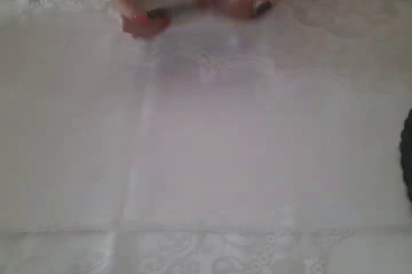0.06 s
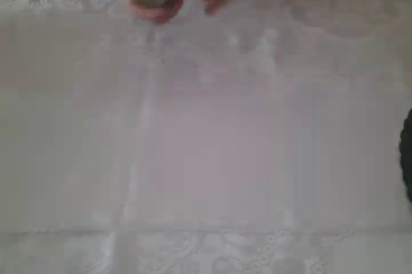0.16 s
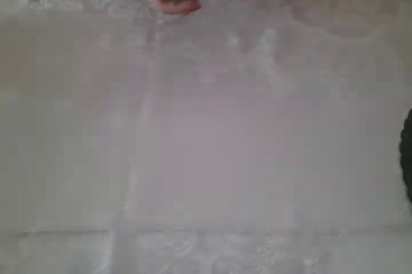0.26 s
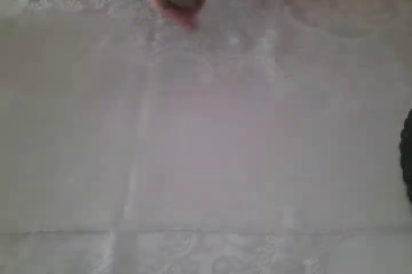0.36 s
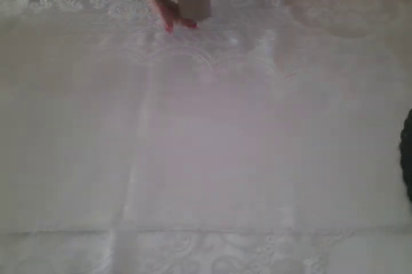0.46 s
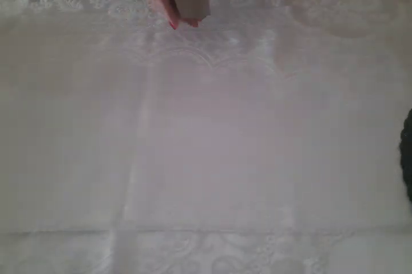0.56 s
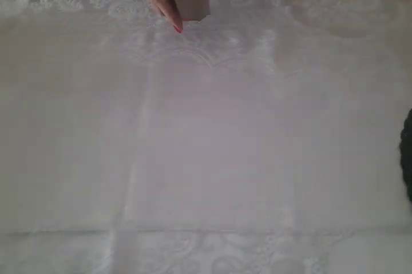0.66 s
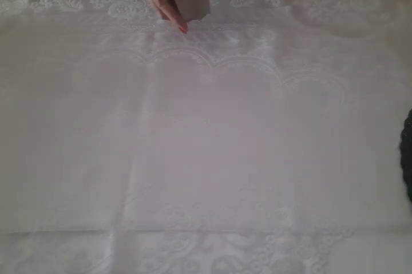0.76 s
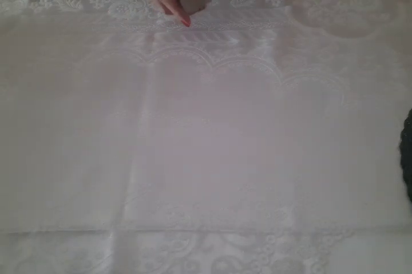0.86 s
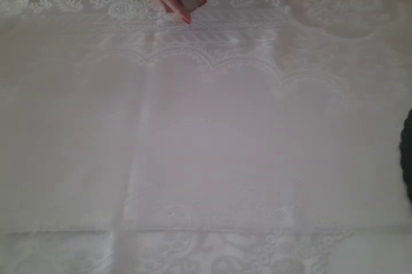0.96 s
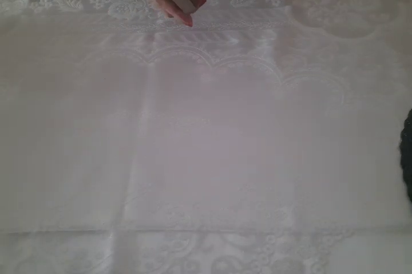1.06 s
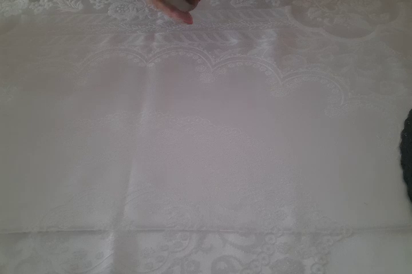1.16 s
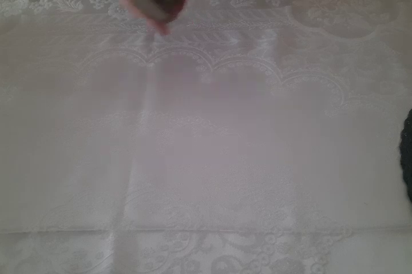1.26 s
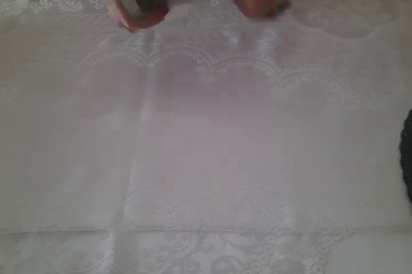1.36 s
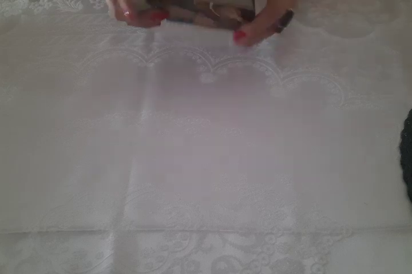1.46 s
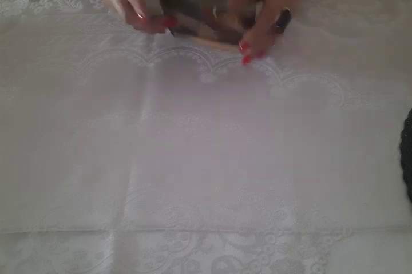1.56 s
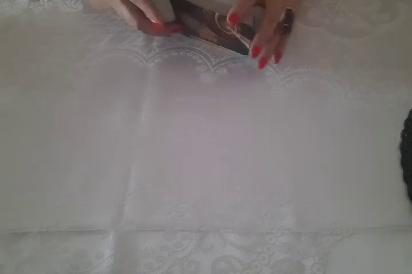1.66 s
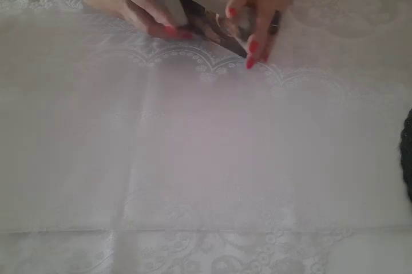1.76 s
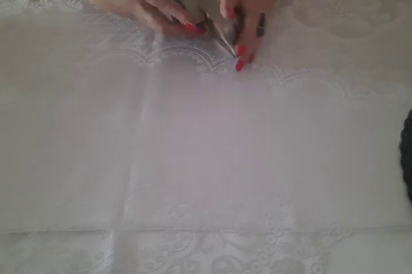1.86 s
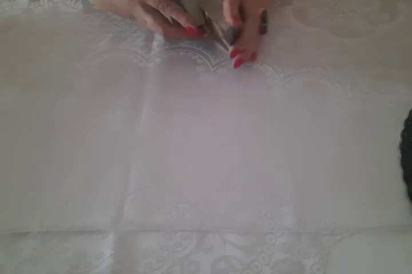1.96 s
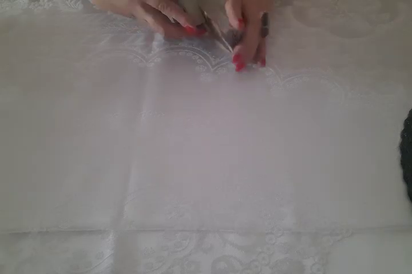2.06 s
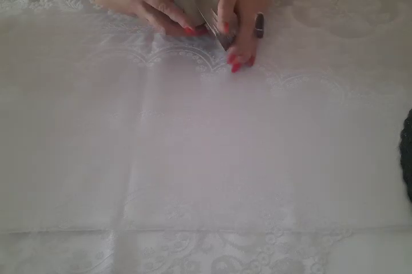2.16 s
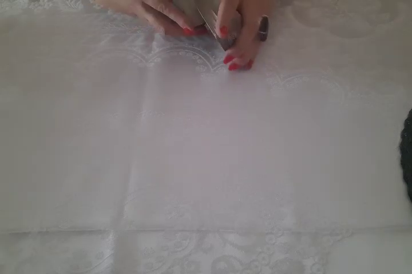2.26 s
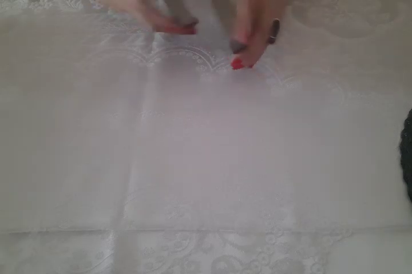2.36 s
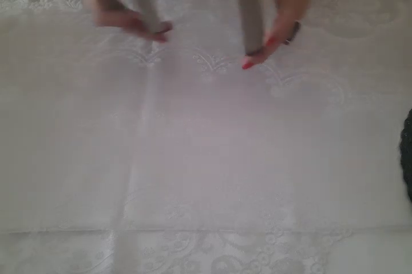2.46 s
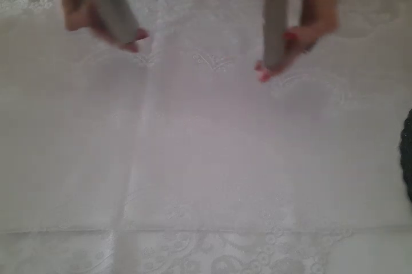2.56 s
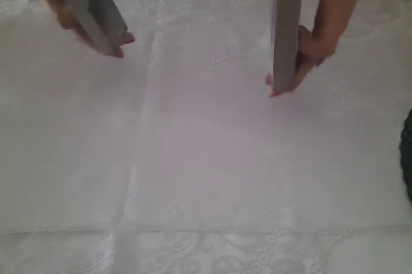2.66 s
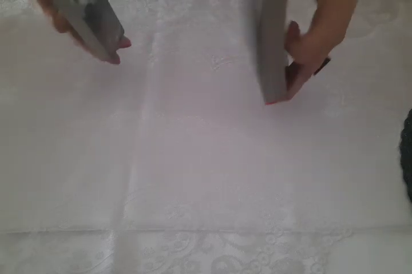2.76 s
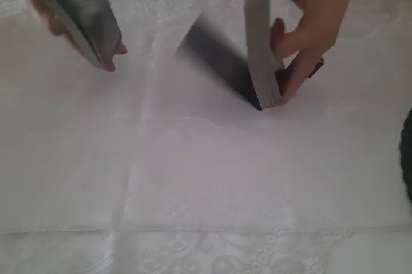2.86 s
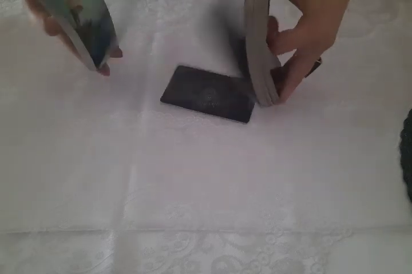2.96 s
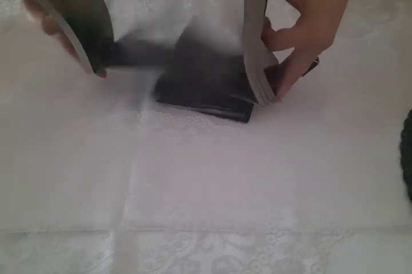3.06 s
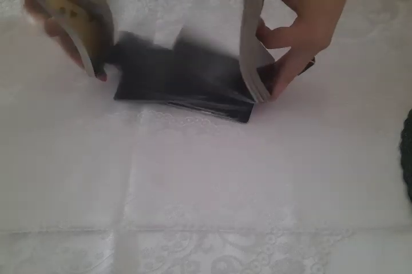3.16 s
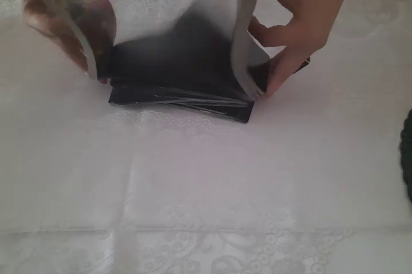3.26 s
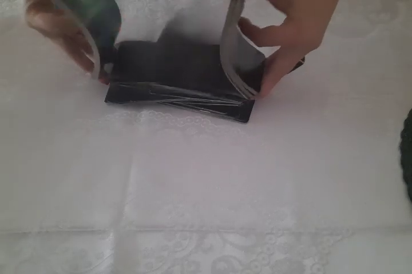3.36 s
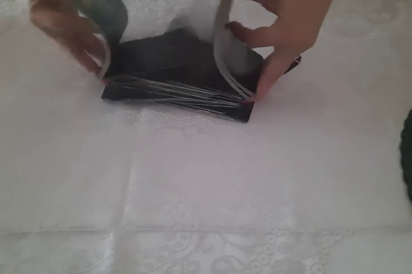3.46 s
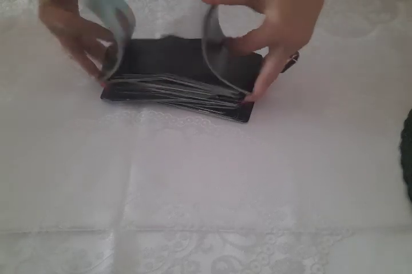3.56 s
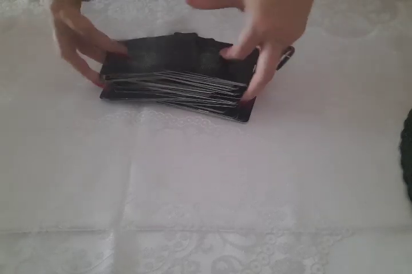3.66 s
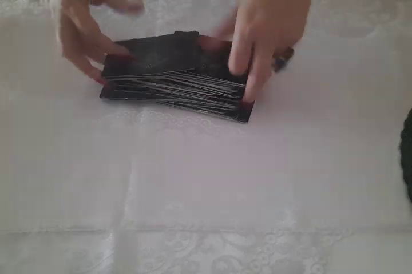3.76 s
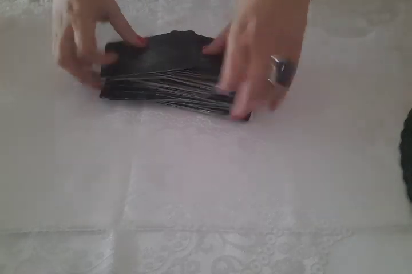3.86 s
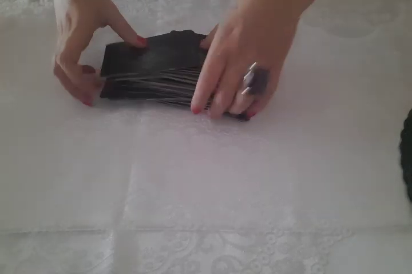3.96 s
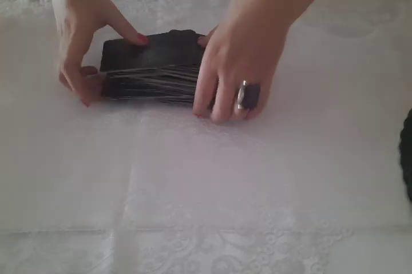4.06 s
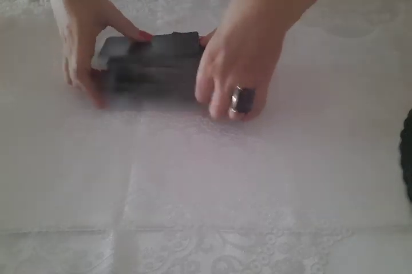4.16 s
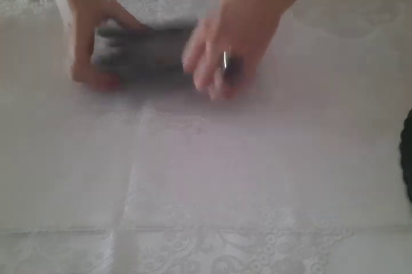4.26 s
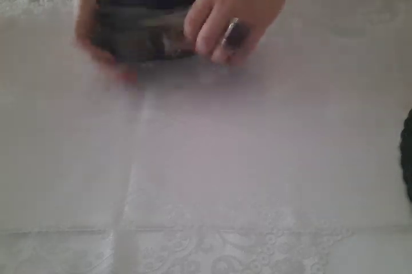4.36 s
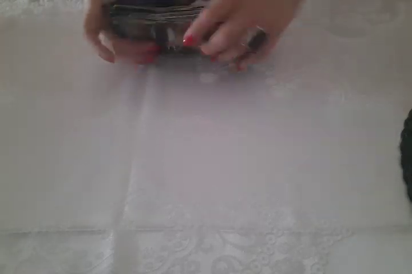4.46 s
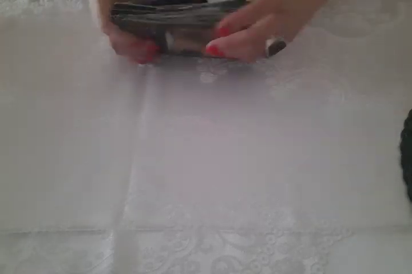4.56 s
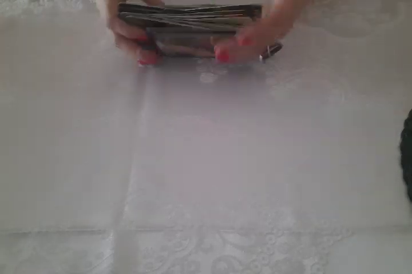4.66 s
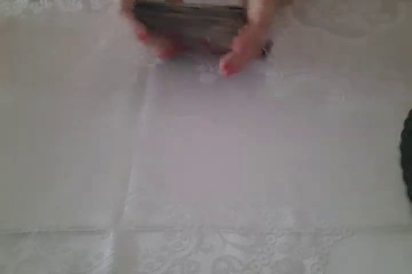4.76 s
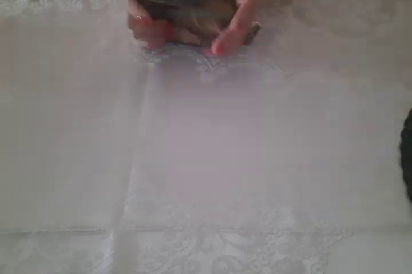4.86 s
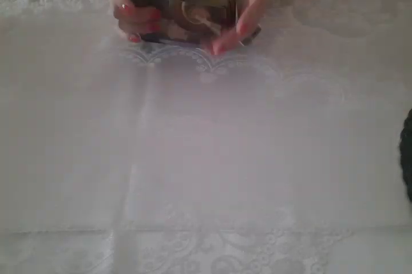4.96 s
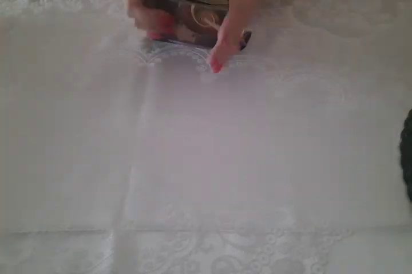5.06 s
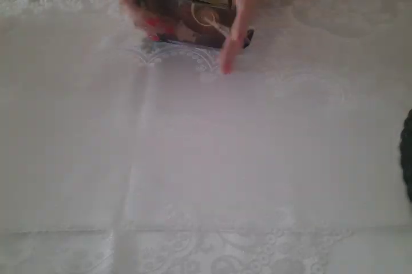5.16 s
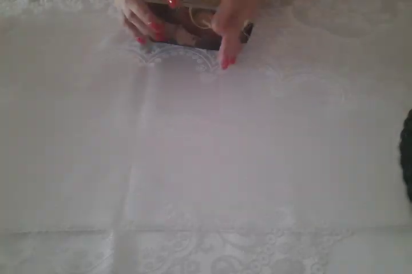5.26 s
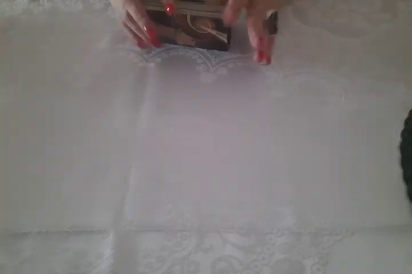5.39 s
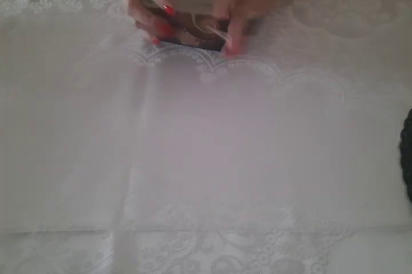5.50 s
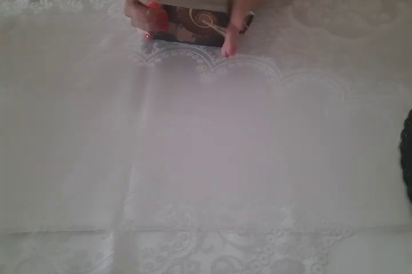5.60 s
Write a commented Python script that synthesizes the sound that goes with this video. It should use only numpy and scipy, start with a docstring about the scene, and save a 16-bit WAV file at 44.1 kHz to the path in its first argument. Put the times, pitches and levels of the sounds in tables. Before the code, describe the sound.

A deck of cards is handled close to the microphone in a small, slightly echoing room. Cards rub softly as the deck is cut and knocks on a cloth-covered table. Then comes one quick, loud riffle, a growing flutter with sharp snaps. Afterwards the deck is squared with light knocks, small ticks and short sliding strokes. Still air and a faint low rumble lie underneath.

```python
"""A deck of cards is handled close by in a small live room, over still air and a low rumble.
First it is cut: card rubs softly on card, and the deck knocks on a cloth-covered table. About three
seconds in comes the riffle: each bent card snaps off a thumb, slaps the pile and slides over it. A few
crack loudly; the rest run into a flutter that grows with the pile. Last, the deck is squared with
light knocks, small ticks and short strokes of sliding friction."""
import sys
import numpy as np
from scipy import signal
from scipy.fft import rfft, irfft
from scipy.io import wavfile
from scipy.ndimage import uniform_filter1d

SR = 44100
rng = np.random.default_rng(int(sys.argv[2]) if len(sys.argv) > 2 else 0)


def wav_record(signal):
    """Record a signal, one row per channel, as 16-bit PCM in the file named by sys.argv[1]."""
    frames = np.transpose(np.atleast_2d(signal))
    bounded = np.clip(frames, -1, 1)
    # unit amplitude maps onto the largest positive 16-bit level
    quanta = np.round(bounded * 32767).astype(np.int16)
    wavfile.write(sys.argv[1], SR, quanta)


N = 248283


def amp(db):
    """Amplitude ratio of a level in decibels."""
    return 10 ** (np.asarray(db) / 20)


def unit(x):
    """Normalisation to rms 1."""
    return x / np.sqrt(np.mean(x ** 2) + 1e-20)


def read(points, hz):
    """Interpolation of a table on a log-frequency axis."""
    frequency_hz, value = np.transpose(points)
    return np.interp(np.log(hz + 1), np.log(frequency_hz + 1), value)


def envelope(rows):
    """Amplitude envelope through rows of time_s, level_db."""
    return amp(np.interp(np.arange(N) / SR, *np.transpose(rows)))


def add(mix, start_s, sound):
    """Superposition: a stereo sound joins the mix at start_s."""
    part = mix[:, max(round(start_s * SR), 0):][:, :sound.shape[1]]
    part += sound[:, :part.shape[1]]


def colour(x, spectrum, size=4096):
    """Minimum-phase filtering: a causal response with the given spectrum."""
    log_gain = np.log(amp(read(spectrum, abs(np.fft.fftfreq(size, 1 / SR)))))
    response = np.fft.ifft(np.exp(np.conj(signal.hilbert(log_gain)))).real[:size // 2]
    return signal.fftconvolve(x, response[None], axes=1)[:, :x.shape[1]]


# likeness of left and right: frequency_hz, correlation
COHERENCE = [(50, 0.64), (300, 0.91), (700, 0.29), (2000, 0.46), (4500, 0.11), (15000, 0.4)]
def pair(x):
    """Partial coherence: two independent signals become a stereo pair, most alike in the bass."""
    a, b = rfft(x)
    same = np.clip(read(COHERENCE, np.fft.rfftfreq(x.shape[1], 1 / SR)), -1, 1)
    return irfft([a, same * a + np.sqrt(1 - same ** 2) * b], x.shape[1])


def noise(spectrum, grain_db=0, grain_s=.004):
    """Random amplitude modulation: coloured stereo noise, roughened in short grains."""
    grains = unit(uniform_filter1d(rng.standard_normal(N), max(round(grain_s * SR), 1)))
    rough = pair(rng.standard_normal((2, N))) * amp(grain_db * grains)
    return unit(colour(rough, spectrum))


def strike(spectrum, decay_s, crack, span_s=.004, lag_s=0, size=4096):
    """Impact: an impulse, lag_s later on the right, and damped chatter; energy of rms 1 over span_s."""
    t = np.arange(size) / SR
    chatter = pair(rng.standard_normal((2, size))) * np.exp(-t / max(decay_s, 1 / SR))
    chatter /= np.linalg.norm(chatter[0])
    arrivals = [max(round(-lag_s * SR), 0), max(round(lag_s * SR), 0)]
    chatter[[0, 1], arrivals] -= crack
    return unit(colour(chatter, spectrum)) * np.sqrt(span_s * SR / size)


# still air of the room: frequency_hz, level_db
AIR_SPECTRUM = [(15, -41.5), (25, -39.5), (55, -11), (78, -1.5), (97, -41.5), (130, -1.5), (256, -10.5),
                (301, -1), (405, -12.5), (714, -7.5), (1480, -20), (2160, -26), (3720, -39.5),
                (11900, -39.5), (16000, -45.5)]
# rumble of the room and of hands on the cloth: frequency_hz, level_db
RUMBLE_SPECTRUM = [(25, -25), (45, -8), (65, 13.5), (90, -7.5), (125, 8), (155, -9.5), (188, 10.5),
                   (245, -14.5), (320, 0.5), (450, -18), (1200, -37.5)]
# course of that rumble: time_s, level_db
RUMBLE_LEVELS = [(0, -61), (.55, -59.5), (1.05, -66), (1.9, -57), (2.1, -73.5), (2.85, -73), (4.25, -69),
                 (4.6, -57.5), (5.63, -68.5)]
def background(air_db=-62):
    """Ambient noise: steady air and a low rumble whose level drifts."""
    return amp(air_db) * noise(AIR_SPECTRUM) + envelope(RUMBLE_LEVELS) * noise(RUMBLE_SPECTRUM)


# time the room takes to fall by 60 dB: frequency_hz, decay_s
REVERB_TIMES = [(100, 0.57), (400, 0.36), (1200, 0.51), (3000, 0.5), (7000, 0.47), (15000, 0.34)]
def tail(onset_s=.0025):
    """Diffuse reverberation of energy 1: a quick build-up, then exponential decay in each band."""
    hz, time_s, bands = signal.stft(pair(rng.standard_normal((2, SR))), SR, nperseg=256)
    decay = amp(-60 * time_s / read(REVERB_TIMES, hz)[:, None])
    wash = signal.istft(bands * decay, SR, nperseg=256)[1][:, :SR]
    wash *= 1 - np.exp(-(np.arange(SR) / SR / onset_s) ** 2)
    return wash / np.linalg.norm(wash[0])


# echoes from near surfaces: delay_s, level_db
EARLY_REFLECTIONS = [(.0032, -19.5), (0.011, -19.5), (0.017, -26), (.0238, -20.5)]
def room(x, wet_db, tails=3, crossfade_hz=5):
    """Reflection: direct sound, single echoes, then tails that crossfade as if the source moved."""
    wet = np.zeros((2, N))
    for delay_s, level_db in EARLY_REFLECTIONS:
        add(wet, delay_s, amp(level_db) * x)
    turn = 2 * np.pi * crossfade_hz * np.arange(N) / SR
    for k in range(tails):
        share = np.sqrt(2 / tails) * np.cos(turn + np.pi * k / tails)  # the squares sum to 1
        wet += signal.fftconvolve(x * share, tail(), axes=1)[:, :N]
    return x + amp(wet_db) * wet


def stroke(start_s, length_s, rise_share=.3, fall_share=.45, creep_db=-16.5, creep_s=.045):
    """Sliding speed in one stroke: the card creeps, speeds up, holds, slows and creeps again."""
    since_s = np.arange(N) / SR - start_s
    progress = since_s / length_s
    ramps = np.minimum(progress / rise_share, (1 - progress) / fall_share)
    outside_s = np.maximum(abs(since_s - length_s / 2) - length_s / 2, 0)
    creep = amp(creep_db) * np.exp(-(outside_s / creep_s) ** 2)
    return np.maximum(np.minimum(ramps, 1), creep)


# strokes of card over card: start_s, length_s, fine_db, body_db
STROKES = [(0, 0.027, -73, -73), (0.045, 0.076, -66.5, -84), (0.194, 0.082, -68, -76),
           (0.25, 0.14, -73.5, -78), (0.642, 0.16, -82, -77.5), (0.903, 0.077, -64, -63.5),
           (0.97, 0.18, -77, -74), (1.115, 0.084, -65, -66.5), (1.17, 0.16, -78, -70.5),
           (1.272, 0.077, -63.5, -63), (1.523, 0.1, -59, -61), (1.62, 0.28, -66, -64),
           (1.904, 0.091, -77, -78), (2.053, 0.095, -76, -74.5), (2.303, 0.047, -69.5, -81),
           (2.535, 0.12, -77, -75.5), (2.688, 0.19, -76.5, -89), (2.904, 0.097, -66.5, -61),
           (3.88, 0.27, -70.5, -68.5), (4.138, 0.064, -64, -64.5), (4.215, 0.088, -69, -68),
           (4.317, 0.2, -64, -58.5), (4.477, 0.21, -67.5, -62.5), (4.658, 0.17, -53, -54),
           (4.866, 0.085, -64.5, -63), (4.981, 0.06, -60.5, -59.5), (5.174, 0.073, -62, -67),
           (5.457, 0.1, -62.5, -61), (5.56, 0.098, -82, -81.5)]
# fine friction and its fuller body: frequency_hz, level_db
FINE_SPECTRUM = [(1000, -24), (3000, -17.5), (4500, -9), (6200, 0), (9500, -4), (12500, 1), (16000, -5)]
BODY_SPECTRUM = [(150, 1.5), (600, -2.5), (1300, 4), (2200, -3), (4000, 0), (8000, -15)]
# brief squeaks of card on card: start_s, length_s, pitch_hz, level_db
CARD_SQUEAKS = [(0.234, 0.11, 2290, -67), (0.612, 0.07, 3050, -81), (4.434, 0.0107, 2580, -51)]
def rubbing(catches_per_s=22, catch_db=9, catch_s=.0015):
    """Sliding friction: thin when light, fuller when pressed; edges catch with a tick, or squeak."""
    fine = sum(amp(fine_db) * stroke(start_s, length_s) for start_s, length_s, fine_db, _ in STROKES)
    body = sum(amp(body_db) * stroke(start_s, length_s) for start_s, length_s, _, body_db in STROKES)
    caught = rng.random(N) < catches_per_s / SR
    catches = signal.lfilter([1], [1, -np.exp(-1 / (catch_s * SR))], caught)
    out = fine * (1 + amp(catch_db) * catches) * noise(FINE_SPECTRUM, grain_db=2, grain_s=.007)
    out += body * noise(BODY_SPECTRUM, grain_db=3, grain_s=.008)
    for start_s, length_s, pitch_hz, level_db in CARD_SQUEAKS:
        band = signal.butter(2, [pitch_hz * .94, pitch_hz * 1.06], "band", fs=SR, output="sos")
        squeak = signal.sosfilt(band, rng.standard_normal((2, SR)))[:, :round(length_s * SR)]
        add(out, start_s, amp(level_db) * unit(squeak) * signal.windows.tukey(squeak.shape[1], .4))
    return out


# deck or fingers meeting the table: start_s, thud_db, knock_db, clack_db, contact_s
TABLE_TAPS = [(1.249, -64, -63, -67.5, 0.015), (1.313, -58.5, -63, -67, 0.0089),
              (1.5533, -36.5, -34, -35.5, .015), (1.839, -57.5, -67, -64.5, .028),
              (3.951, -41.5, -55, -64.5, .019), (4.084, -54.5, -64.5, -73, 0.0076),
              (4.391, -69, -54, -58.5, 0.027), (4.457, -52, -56, -61.5, .011),
              (4.539, -56, -56, -63, 0.019), (4.5718, -64, -52, -44.5, 0.00181),
              (4.899, -52, -50, -59.5, 0.021), (5.003, -58, -59.5, -56.5, 0.00257),
              (5.219, -52, -55.5, -60, 0.016), (5.505, -59.5, -80, -68, .017)]
# low thud, middle knock and clack of card edges: frequency_hz, level_db
THUD_SPECTRUM = [(30, -19), (65, 1), (90, -13.5), (122, 6), (160, -1), (230, -4), (320, -0.5), (450, -21.5),
                 (1200, -52)]
KNOCK_SPECTRUM = [(180, -36), (350, 0.5), (480, 5.5), (650, -2.5), (800, -1.5), (1100, -25.5), (3000, -54)]
CLACK_SPECTRUM = [(500, -30.5), (900, 2), (1300, -1.5), (1750, -7.5), (2400, -15.5), (3500, -21.5),
                  (6000, -36), (15000, -63)]
def taps(settle_contacts=.9, settle_db=-2.5, span_s=.02):
    """Double impact: one corner of the deck lands, then the other; the table thuds and edges clack."""
    out = np.zeros((2, N))
    for start_s, thud_db, knock_db, clack_db, contact_s in TABLE_TAPS:
        for at_s, corner_db in (start_s, 0), (start_s + settle_contacts * contact_s, settle_db):
            thud = amp(thud_db) * strike(THUD_SPECTRUM, contact_s + .017, crack=1, span_s=span_s)
            knock = amp(knock_db) * strike(KNOCK_SPECTRUM, contact_s + .0045, crack=.33, span_s=span_s)
            clack = amp(clack_db) * strike(CLACK_SPECTRUM, contact_s, crack=.31, span_s=span_s)
            add(out, at_s, amp(corner_db) * (thud + knock + clack))
    return out


def gate(start_s, end_s, release_db_per_s=796.5):
    """Exponential release: the run opens, holds, and dies quickly once the thumbs are empty."""
    t = np.arange(N) / SR
    return (t >= start_s) * amp(-release_db_per_s * np.maximum(t - end_s, 0))


# how hard the thumbs let the cards run: time_s, effort_db
THUMB_EFFORT = [(2.985, -13.5), (3.095, -11), (3.112, 2.5), (3.195, -8), (3.224, -4.5), (3.43, 2.5),
                (3.55, -9.5), (3.63, 4), (3.705, -5)]
# fluttering cards, expelled air and sliding faces: frequency_hz, level_db
FLUTTER_SPECTRUM = [(150, -31), (400, -7.5), (700, 8.5), (1000, -10), (1600, 0), (2200, 4), (3500, -4.5),
                    (6000, -10.5), (10000, -29.5), (16000, -32)]
PUFF_SPECTRUM = [(25, -22.5), (45, -14), (80, -7), (120, -4.5), (250, -5), (350, -1.5), (450, -1),
                 (700, -1), (1100, -15), (3000, -42.5)]
HISS_SPECTRUM = [(800, 4), (3000, 3.5), (6000, -1.5), (9500, -11), (12000, -7.5), (16000, -16.5)]
def riffle(clicks_per_s=150, spread_db=.5, decay_s=.0056, first_lands_s=2.9, last_lands_s=3.645):
    """Shot noise: small snaps merge into a flutter; landing cards puff out air and hiss as they slide."""
    clicks = (rng.random(N) < clicks_per_s / SR) * amp(spread_db * np.clip(rng.standard_normal(N), -2, 2))
    power = signal.lfilter([1], [1, -np.exp(-2 / (decay_s * SR))], clicks ** 2)
    power /= uniform_filter1d(power, size=1500) + 1e-3 * power.mean()  # the thumbs keep an even pace
    crackle = pair(rng.standard_normal((2, N))) * np.sqrt(power)
    effort = envelope(THUMB_EFFORT) * gate(THUMB_EFFORT[0][0], THUMB_EFFORT[-1][0])
    piled_s = np.clip(np.arange(N) / SR, first_lands_s, last_lands_s) - first_lands_s
    flutter_db, puff_db = -46 + 16.5 * piled_s, -42 + 7.5 * piled_s  # both grow with the pile
    flutter = amp(flutter_db) * unit(colour(crackle, FLUTTER_SPECTRUM))
    puffs = amp(puff_db) * gate(first_lands_s, last_lands_s) * unit(colour(crackle, PUFF_SPECTRUM))
    hiss = amp(-35.5) * noise(HISS_SPECTRUM, grain_db=2.5, grain_s=.0027)
    return effort * (flutter + puffs + hiss)


# the riffle's louder snaps, plus small card ticks as the deck is handled before and after:
# start_s, slap_db, flex_db, edge_db
SNAPS_AND_TICKS = [(1.312, -52, -52, -56.5), (1.828, -85, -54, -75), (2.717, -75, -80, -68),
                   (2.804, -81, -86, -68), (2.9116, -49.5, -69.5, -58), (2.9864, -49.5, -50.5, -45),
                   (3.0165, -48, -43.5, -54), (3.0315, -32.5, -18, -28.5), (3.0483, -24, -32.5, -38),
                   (3.056, -38.5, -32.5, -36.5), (3.1037, -31.5, -26.5, -23), (3.2049, -38.5, -36, -34),
                   (3.2224, -45.5, -28, -29.5), (3.245, -42, -23.5, -27.5), (3.2517, -30, -28, -33),
                   (3.2771, -42, -26.5, -35), (3.3025, -34.5, -28, -24.5), (3.3265, -43.5, -26, -26.5),
                   (3.3466, -33.5, -19, -29.5), (3.3576, -25.5, -21, -34.5), (3.3699, -23, -17.5, -25),
                   (3.384, -34.5, -22, -25.5), (3.4549, -37, -24.5, -27), (3.4803, -23, -26.5, -31.5),
                   (3.506, -20.5, -13, -21), (3.5141, -25, -26.5, -50), (3.5304, -20, -22.5, -24.5),
                   (3.563, -26.5, -23, -38), (3.5896, -25.5, -18.5, -25), (3.6106, -25, -32, -31.5),
                   (3.625, -29.5, -16.5, -22.5), (4.4385, -62, -44.5, -51.5), (4.7128, -70, -50.5, -54)]
# tick of the edge, flex of the card and slap on the pile: frequency_hz, level_db
EDGE_SPECTRUM = [(2000, -21), (4600, 0.5), (7000, 1.5), (9500, -5), (12000, 0.5), (16000, -9.5)]
FLEX_SPECTRUM = [(300, -33), (700, -16), (950, 1.5), (1400, -5), (2100, -2.5), (3000, -7.5), (4400, -10),
                 (7000, -31)]
SLAP_SPECTRUM = [(40, -32), (110, -3.5), (250, -11.5), (400, 1), (700, -4.5), (1100, -16), (3000, -49)]
def snaps(bend_spread=.06, lag_spread_s=.00003, scrape_db=-7, chatter_s=.0015):
    """Elastic release: the edge scrapes and ticks off the thumb, the card flexes and slaps the pile."""
    out = np.zeros((2, N))
    variations = rng.standard_normal((len(SNAPS_AND_TICKS), 2))
    for (start_s, slap_db, flex_db, edge_db), (bend, place) in zip(SNAPS_AND_TICKS, variations):
        shift = [np.exp(bend_spread * bend), 1]  # each card's bend shifts its frequencies
        edge_spectrum = np.multiply(EDGE_SPECTRUM, shift)
        flex_spectrum = np.multiply(FLEX_SPECTRUM, shift)
        lag_s = lag_spread_s * place
        # a card that flexes hard lets go in one crack; a slack one scrapes past the thumb
        crack = np.clip(.4 + .11 * (flex_db - edge_db), .1, 1.4)
        scrape = amp(edge_db + scrape_db) * strike(edge_spectrum, decay_s=.0055, crack=0)
        tick = amp(edge_db) * strike(edge_spectrum, decay_s=chatter_s, crack=crack, lag_s=lag_s)
        flex = amp(flex_db) * strike(flex_spectrum, decay_s=.0027, crack=.5 * crack, lag_s=lag_s)
        slap = amp(slap_db) * strike(SLAP_SPECTRUM, decay_s=.87 * chatter_s, crack=.99)
        add(out, start_s - .0012, scrape)
        add(out, start_s + .0003, tick + flex)
        add(out, start_s + .00035, slap)
    return out


def scene():
    """Superposition, a little to the left; the table sends a larger share into the room than the cards."""
    cards = room(snaps() + riffle() + rubbing(), wet_db=-4.5) * amp([[1.2], [-.9]])
    table = room(taps(), wet_db=-.2) * amp([[1.8], [-1.3]])
    return cards + table + background() * amp([[.7], [-.7]])


def record(dry, bass_hz=36, cutoff_hz=16050):
    """Band limiting: the microphone's bass roll-off, clipping at full scale, then a steep low-pass."""
    high_pass = signal.butter(2, bass_hz, "high", fs=SR, output="sos")
    low_pass = signal.firwin(511, cutoff_hz, window=("kaiser", 8), fs=SR)
    clipped = np.clip(signal.sosfilt(high_pass, dry), -1, 1)
    return signal.oaconvolve(clipped, low_pass[None], "same", axes=1)


dry = scene()
out = record(dry)
wav_record(out)
```